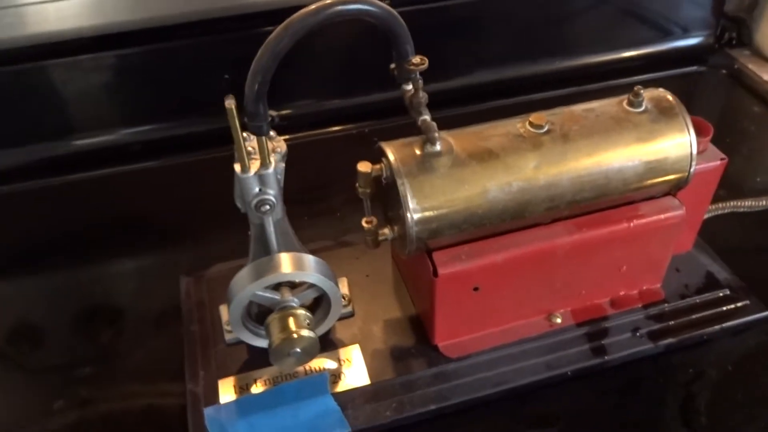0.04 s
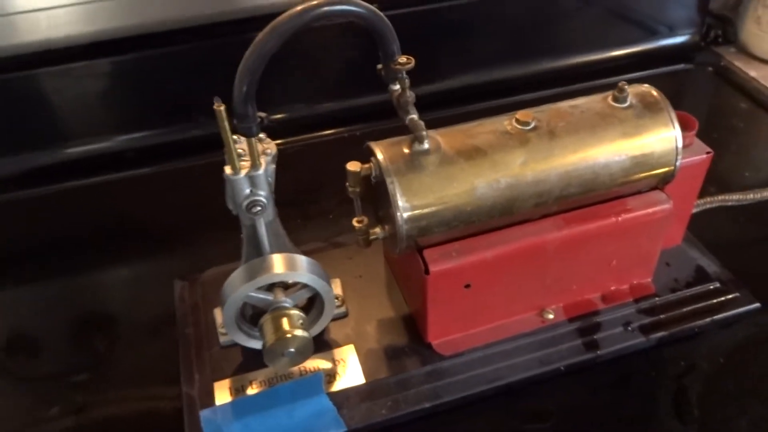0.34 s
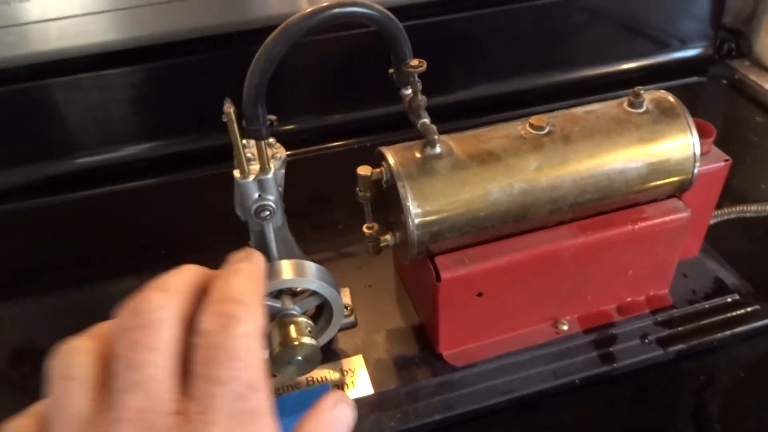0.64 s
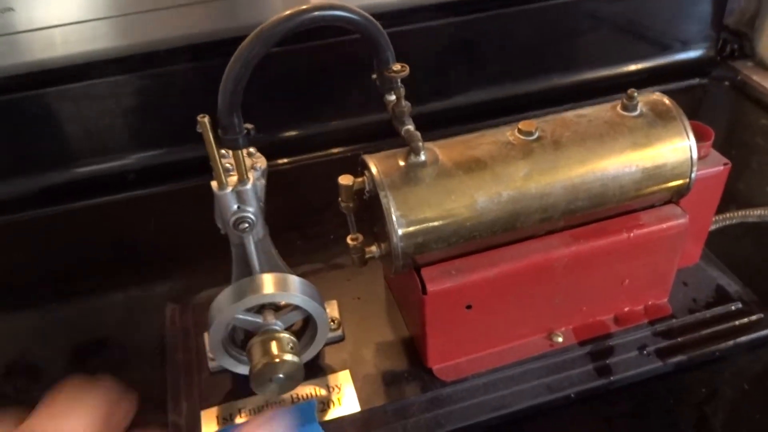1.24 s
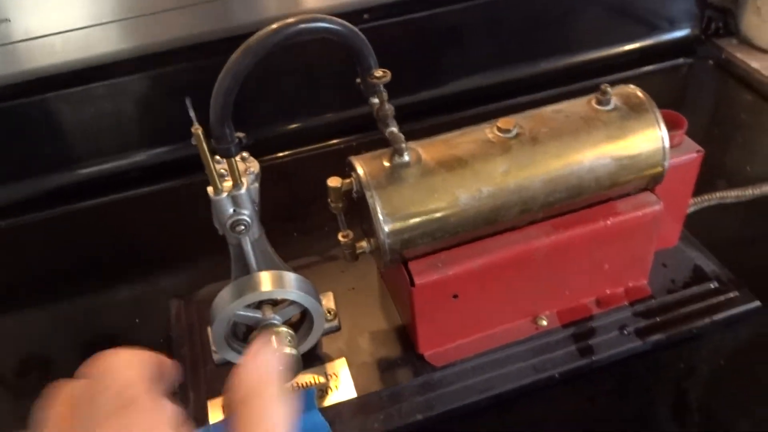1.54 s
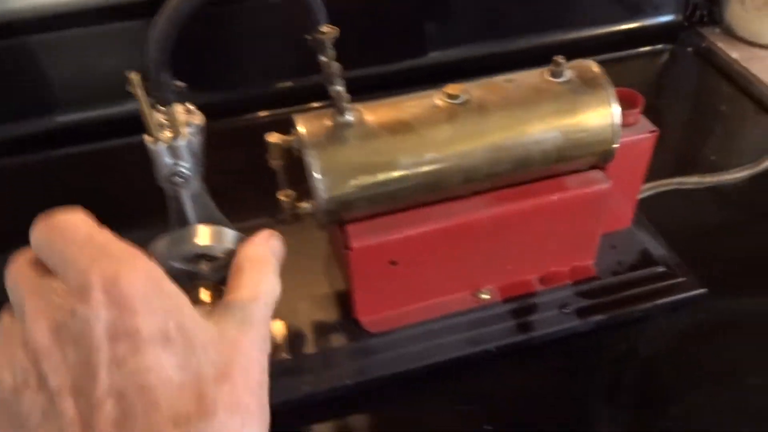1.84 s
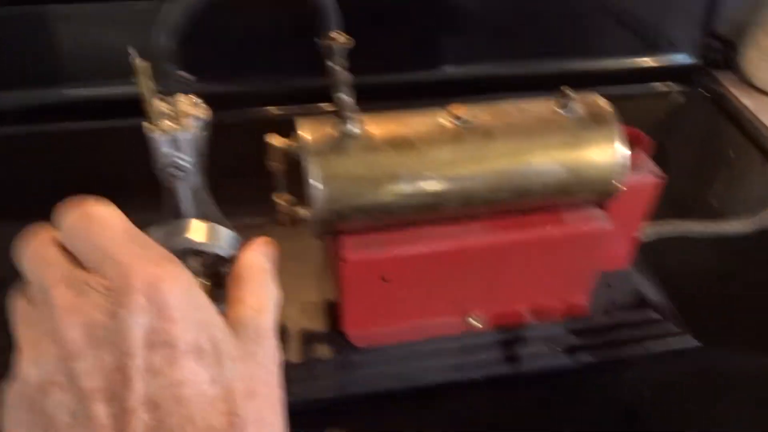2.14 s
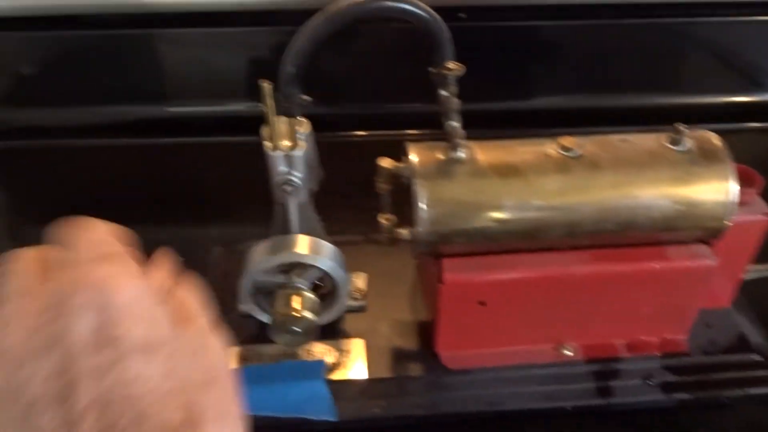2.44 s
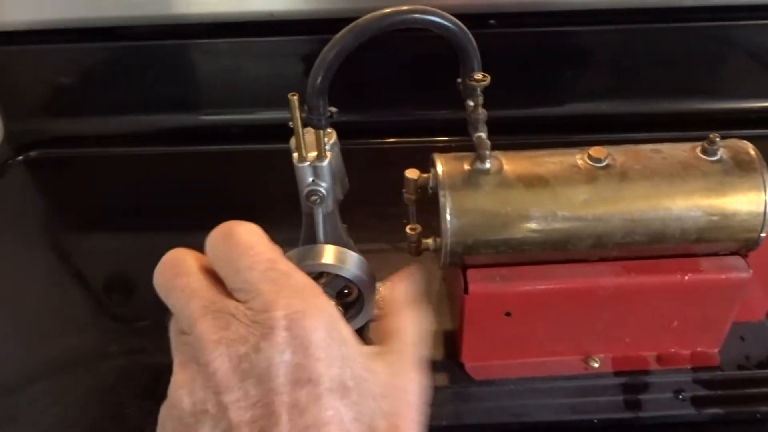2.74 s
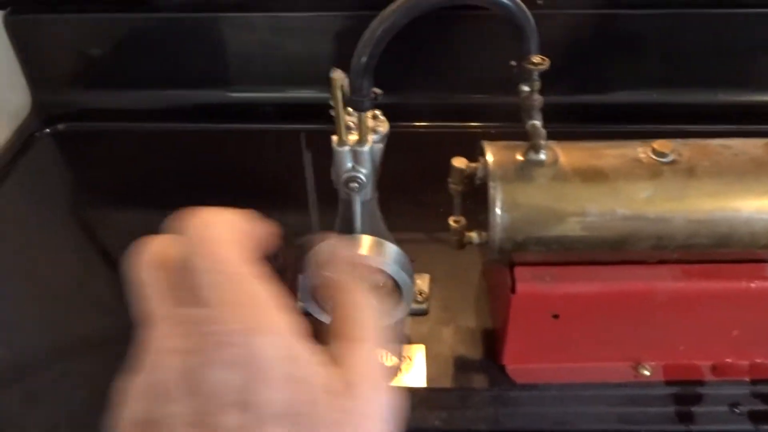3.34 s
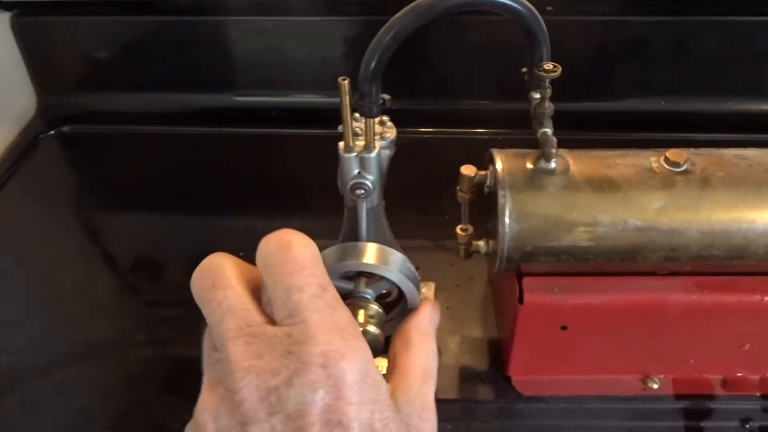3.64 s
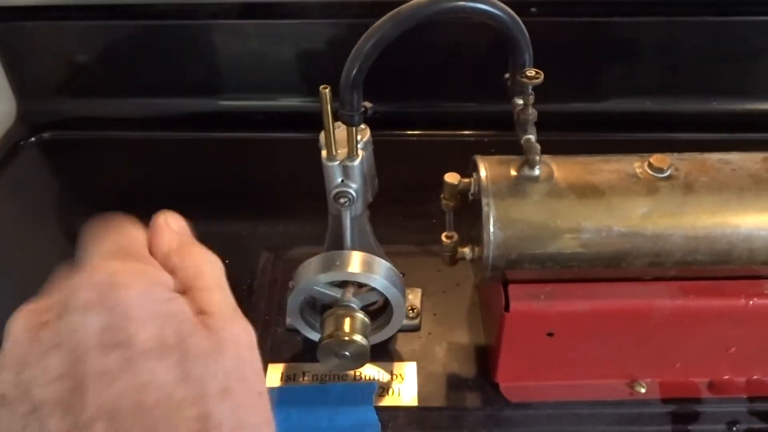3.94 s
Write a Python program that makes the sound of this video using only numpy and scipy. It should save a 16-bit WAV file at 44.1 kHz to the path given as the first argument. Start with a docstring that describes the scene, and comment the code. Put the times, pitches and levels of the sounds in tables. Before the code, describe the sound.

A small steam engine in a metal tray leaks a bright, wavering hiss. The exhaust puffs once, then the hiss grows louder while the linkage clacks and a hand bumps the base. The boiler simmers faintly underneath.

```python
"""A model steam engine stands under pressure in a metal tray while a hand tries to turn its flywheel.
First wet steam hisses past the piston, singing softly as it surges, and the hand thumps the base.
Near 2 s the exhaust puffs; the linkage clacks, and the leak shifts to the valve and back to the piston.
Last the crank comes round, the flywheel clinks and the exhaust opens again, quietly.
Throughout, the boiler simmers over a faint hum."""
import sys
import numpy as np
from scipy import signal
from scipy.fft import rfft, irfft
from scipy.io import wavfile

SR = 44100
rng = np.random.default_rng(int(sys.argv[2]) if len(sys.argv) > 2 else 0)


def unload_wav(signal):
    """Save mono or channel-first audio to the path in sys.argv[1] as 16-bit WAV at rate SR, clipped to [-1, 1]."""
    wavfile.write(
        sys.argv[1],
        SR,
        np.round(np.clip(np.atleast_2d(signal).T, -1, 1) * 32767).astype(np.int16),
    )


N = 176400


def cylinder_leak():
    """Turbulent jet noise: steam forced past the piston makes the main bright hiss."""
    # One list per spell of leaking. Each row: time in seconds, relative level in dB.
    spells = [
        [(0.0, -23), (0.014, -31.5), (0.024, -33.5), (0.076, -30), (0.164, -31), (0.176, -24), (0.208, -29.5),
         (0.308, -26.5), (0.332, -31), (0.596, -32), (0.614, -25), (0.778, -33), (0.806, -27), (0.9, -31)],
        [(0.9, -38), (0.928, -25.5), (0.948, -27.5), (0.972, -25), (1.062, -26.5), (1.232, -22.5),
         (1.27, -28.5), (1.278, -26.5), (1.412, -28), (1.426, -22.5), (1.476, -28.5), (1.824, -27.5),
         (1.834, -36), (1.84, -28)],
        [(2.07, -37), (2.088, -29.5), (2.216, -29), (2.256, -31), (2.33, -24), (2.346, -19.5), (2.356, -33),
         (2.372, -21), (2.384, -27), (2.398, -19), (2.404, -46), (2.41, -25)],
        [(3.03, -41), (3.052, -20), (3.234, -21), (3.412, -20), (3.468, -20), (3.682, -20.5), (3.706, -28.5),
         (3.756, -22), (3.77, -20), (3.808, -30.5), (3.83, -26), (3.84, -39)],
    ]
    # Spectrum of the jet. Each row: frequency in Hz, relative density in dB.
    colour = [(100, -28), (300, -24), (500, -21), (1500, -12.5), (2800, -11), (4300, -12), (7000, -4),
              (9500, -5.5), (11400, -10.6), (13500, 2), (15600, -3)]
    # Resonances of the steam path. Each row: centre in Hz, width in Hz, lift in dB.
    peaks = [(1368, 80, 7), (2805, 64, 5.5), (3630, 110, 3.8), (4155, 360, 6.5), (4730, 253, 10),
             (5080, 175, 5), (6326, 260, 7.0), (6700, 53, 4.5), (7770, 300, 4), (9200, 110, 5.5),
             (10060, 79, 11), (10500, 90, 10.5), (11140, 113, 13), (11920, 330, 8.5), (12700, 130, -13),
             (12870, 140, 9.5)]
    # Shelf on the lower part of the hiss. Each row: time in seconds, lift in dB.
    low_shelf = [(0, -2), (.15, -1), (.26, 6.5), (.4, 2.5), (.58, 3.5), (.64, 7), (.76, 2), (.9, 6),
                 (1.05, 6.5), (1.18, 4.5), (1.4, 1.5), (1.8, 0), (2.3, 3.5), (3.1, -6), (3.45, -2.5),
                 (3.7, 0.5)]
    hiss = jet(colour, peaks, flutter_db=0.85, flutter_rate=61)
    hiss = shelve_lows(hiss, envelope(low_shelf), edge_hz=2430)
    return from_db(2.5) * hiss * sum(flow(spell) for spell in spells)


def valve_leak():
    """Jet noise through the resonant valve opening whistles; its lower part grows faster with flow."""
    # Steam escaping at the valve. Each row: time in seconds, relative level in dB.
    spell = [(2.408, -27), (2.43, -20), (2.475, -26), (2.505, -22), (2.522, -25), (2.538, -20.5),
             (2.562, -24), (2.59, -20.5), (2.64, -24.5), (2.7, -20.5), (2.79, -20.5), (2.86, -21.5),
             (2.89, -18.5), (2.94, -17), (2.962, -19.5), (2.98, -22.5), (3.02, -24.5), (3.035, -17.5),
             (3.05, -20)]
    # Spectrum of the jet. Each row: frequency in Hz, relative density in dB.
    colour = [(100, -34), (300, -22), (500, -21.5), (1500, -10.5), (2800, -13), (4300, -6.5), (7000, -6),
              (9500, -8), (11400, -15.5), (13500, -7), (15600, -9)]
    # Resonances of the opening. Each row: centre in Hz, width in Hz, lift in dB.
    peaks = [(3960, 160, 10), (4750, 150, 7), (5930, 800, 6.5), (7550, 300, 8), (8540, 400, 11),
             (9420, 360, 8.5), (10120, 490, 11.5), (11050, 520, 10.7), (12000, 580, 5.8), (12545, 320, 8),
             (14200, 600, 7.5), (15200, 600, 10.7)]
    hiss = jet(colour, peaks, flutter_db=.5, flutter_rate=50)
    gain, middle_flow = flow(spell), from_db(-20.5)
    swell = (gain / middle_flow + 1e-9) ** 0.6
    return from_db(-1) * gain * shelve_lows(hiss, swell, edge_hz=12000)


def exhaust():
    """Pressure release: the cylinder empties in a puff that holds, then drops; steam trickles on."""
    # Openings of the port. Each row: start and end in seconds, relative puff level in dB,
    # seconds for the puff to fall 20 dB, relative trickle level in dB.
    openings = [(1.845, 2.085, -14.5, 0.098, -29.5), (3.827, 4.1, -38, .05, -31.5)]
    # Spectrum of the jet. Each row: frequency in Hz, relative density in dB.
    colour = [(100, -20), (300, -15), (500, -20.5), (1500, -14.5), (2800, -10.5), (4300, -9.5), (7000, -5),
              (9500, -14), (11400, -8.5), (13500, -4), (15600, -11.5)]
    # Resonances of the exhaust. Each row: centre in Hz, width in Hz, lift in dB.
    peaks = [(840, 630, 14.4), (1320, 300, 4.6), (3770, 220, 7), (4600, 400, 3.9), (5880, 300, 5.1),
             (6400, 220, 3.5), (7570, 260, 3.7), (8470, 800, 11.7), (9300, 310, 14.3), (10070, 400, 12),
             (14700, 320, 4)]
    gain = 0
    for start, end, puff_db, fall_s, trickle_db in openings:
        age = seconds() - start
        attack = np.clip(age / 0.002, 0, 1)
        puff = from_db(puff_db - 20 * np.clip(age / fall_s, 0, 2) ** 3.3)
        gain = gain + attack * np.hypot(puff, from_db(trickle_db)) * opened(start, end)
    return from_db(-4) * gain * jet(colour, peaks, flutter_db=2.0, flutter_rate=82)


def singing():
    """Cavity resonance: turbulence draws airy tones from narrow spaces of the cylinder in the surge."""
    # Strength of the singing. Each row: time in seconds, relative level in dB.
    surge = [(.925, -35.5), (1.02, -33), (1.15, -39.5), (1.24, -48)]
    # Cavity modes. Each row: centre in Hz, bandwidth in Hz, relative level in dB.
    cavities = [(1480, 73, -4.5), (2160, 120, -10), (4540, 120, -2)]
    noise, tones = rng.standard_normal(N), 0
    for hz, width, db in cavities:
        t60 = np.log(1000) / (np.pi * width)
        tones = tones + from_db(db) * rms_one(ring(noise, hz, t60))
    return flow(surge) * tones


def linkage():
    """Impact noise: each clack is a short tick of contact and a knock in the modes of the frame."""
    # Each row: start in seconds, relative tick level in dB, tick centre in Hz,
    # relative knock level in dB, most strongly driven frequency of the knock in Hz.
    clacks = [(.0145, -9, 2440, -31, 1900), (.095, -27, 1700, -23, 970), (1.825, -35, 2500, -24, 940),
              (2.027, -30, 2500, -23, 820), (2.248, -33, 3000, -15.5, 1350),
              (2.3364, -10, 10000, -35, 1400), (2.3434, -22, 10000, -20, 1400),
              (2.3695, -16, 7000, -20, 900), (2.3754, -11, 6500, -12, 1250), (2.392, -8.5, 8000, -19, 2600),
              (2.3955, -13, 6200, -10, 2300), (2.5681, -13.5, 6040, -10.5, 2040),
              (2.9845, -10, 8000, -11, 1290), (2.988, -19, 2000, -14, 700), (3.028, -22, 6000, -13.5, 910),
              (3.688, -23, 5500, -14, 1400), (3.7815, -11, 6000, -14.5, 856), (3.7987, -12, 2600, -8, 1360),
              (3.8297, -8, 5200, -19, 1410), (3.845, -27, 5000, -10, 1900)]
    # Spectrum of a tick. Each row: frequency in Hz, relative density in dB.
    tick_colour = [(200, 13), (1500, 11.5), (3000, 3.5), (5500, 1.5), (11000, -5), (16000, -16)]
    # Each row: frequency in Hz, relative level in dB, 60 dB decay time in seconds.
    frame_modes = [(685, -6.5, 0.038), (864, -12.5, .025), (1010, -9.5, .025), (1275, -9.5, 0.035),
                   (1425, -10, .025), (1880, -16, 0.018), (2110, -17, 0.024), (2450, -15, .025),
                   (2990, -18, .014)]
    tick_half_octaves, knock_spread_octaves = 0.81, .85
    times, tick_db, tick_hz, knock_db, strongest_hz = np.transpose(clacks)
    noise = coloured(rng.standard_normal(N), tick_colour)
    fade = decay(np.arange(SR // 10) / SR, t60=0.014)
    ticks, knocks = np.zeros((2, N)), 0
    for start, db, hz in zip((times * SR).astype(int), tick_db, tick_hz):
        span = slice(start, start + len(fade))
        edges = np.minimum(hz * 2 ** (tick_half_octaves * np.array([-1, 1])), SR / 2 - 1000)
        ticks[:, span] += signal.sosfilt(butter(2, edges, "band"), from_db(db) * fade * noise[:, span])
    for k, (hz, db, t60) in enumerate(frame_modes):
        share = resonance(np.log2(hz / strongest_hz), knock_spread_octaves) ** 2
        gains = share * from_db(knock_db + db + rng.standard_normal(len(times)))
        knocks = knocks + (-1) ** k * ring(strikes(times, gains), hz, t60)
    return ticks + knocks


def base():
    """Soft contact limits bandwidth: bumps of the hand set the low modes of the base booming."""
    # Each row: start in seconds, relative level in dB, most strongly driven frequency in Hz.
    thumps = [(1.217, -19, 120), (1.248, -10, 133), (2.285, -30, 210), (2.34, -22.5, 192),
              (2.356, -25.5, 182), (2.376, -30, 180), (2.985, -20, 190), (2.994, -20.5, 190),
              (3.027, -20.5, 180), (3.052, -18.5, 225), (3.769, -21, 149), (3.78, -11.5, 167),
              (3.817, -19.5, 162)]
    # Each row: frequency in Hz, relative level in dB, 60 dB decay time in seconds.
    base_modes = [(65.6, -13, 0.76), (117, -4.5, 0.058), (149.8, 4.5, 0.065), (205, 1.5, 0.063),
                  (274, 3.5, 0.024)]
    contact_s, spread_octaves = 0.0028, 0.57
    times, thump_db, strongest_hz = np.transpose(thumps)
    boom = 0
    for k, (hz, db, t60) in enumerate(base_modes):
        share = resonance(np.log2(hz / strongest_hz), spread_octaves)
        boom = boom + (-1) ** k * ring(strikes(times, share * from_db(thump_db + db)), hz, t60)
    boom = signal.sosfilt(butter(2, 78, "high"), boom)
    softness = np.exp(-1 / (contact_s * SR))
    return from_db(7.5) * signal.lfilter([1 - softness], [1, -softness], boom)


def flywheel():
    """Modal ringing: the wheel clinks as the crank comes round, then chatters briefly on its shaft."""
    # Each row: frequency in Hz, relative level in dB, 60 dB decay time in seconds.
    wheel_modes = [(3780, -6, .03), (4095, -1, 0.025), (4240, 1.5, 0.032), (4500, 2, 0.027),
                   (4660, 2, 0.024), (5070, -3, 0.025)]
    strike_s = 3.829
    age = seconds() - strike_s
    chatter = grains(per_s=1800, spread_db=1.5) * (age > 0) * decay(np.abs(age), t60=0.13)
    blows = from_db(-25.5) * (strikes([strike_s], 1) + from_db(-5) * chatter)
    return sum((-1) ** k * ring(blows * from_db(db), hz, t60)
               for k, (hz, db, t60) in enumerate(wheel_modes))


def simmer():
    """Bubble resonance: small bubbles collapse in the boiler, each a brief damped tone."""
    # Liveliness of the boiler. Each row: time in seconds, relative level in dB.
    liveliness = [(0, 4.5), (.8, 0), (1.05, 4), (1.6, 3), (1.9, -4.5), (2.25, 7.5), (2.7, 0), (3.05, 7),
                  (3.3, -3), (3.7, 5), (4, 1)]
    bubbles_per_s, ring_cycles = 420, 11.7
    pitches = np.geomspace(680, 1600, 18)
    pan = from_db([[4.5], [-4.5]])
    pops = 0
    for k, hz in enumerate(pitches):
        collapses = grains(bubbles_per_s / len(pitches), spread_db=2.0)
        pops = pops + ring(collapses, hz, ring_cycles / hz) * pan ** (-1) ** k  # alternate sides
    return from_db(-48) * envelope(liveliness) * rms_one(pops)


def background():
    """Tones over a noise floor: two phase-modulated hum lines waver in the boiler and room rumble."""
    # Each row: frequency in Hz, rms level in dB.
    hum_lines = [(177.6, -54.5), (387.6, -56)]
    # Low spectrum of the rumble. Each row: frequency in Hz, relative density in dB.
    rumble_colour = [(15, -52), (25, -31), (86, -11), (119, -10), (145, -6), (174, -1.5), (264, -10.5),
                     (390, -10), (412, -23.5), (700, -10.5), (910, -27), (1540, -120)]
    hum = sum(from_db(db) * np.sqrt(2) * np.sin(2 * np.pi * hz * seconds() + .5 * drift(2.6))
              for hz, db in hum_lines)
    rumble = coloured(rng.standard_normal(N), rumble_colour + [(1500, -16), (6000, -48)])
    return hum + from_db(-46.5) * rumble


def tray(x, echo_db):
    """Reverberation: the tray adds short dense reflections, much alike at both ears."""
    t, likeness = np.arange(SR // 2) / SR, .8
    mid, side = rng.standard_normal((2, len(t))) * decay(t, t60=0.21) * (t > .002)
    side = signal.sosfilt(butter(1, 2500), side) * np.sqrt(1 - likeness)
    tail = np.array([mid + side, mid - side]) / np.sqrt(np.sum(mid ** 2 + side ** 2))
    return x + from_db(echo_db) * signal.fftconvolve(x, tail, axes=1)[:, :N]


def jet(colour, peaks, flutter_db, flutter_rate):
    """Source and filter: fluttering turbulence and spitting droplets excite a steam path."""
    turbulence = rng.standard_normal(N)
    droplets = from_db(-10.5) * rms_one(grains(per_s=500, spread_db=2))
    flutter = from_db(flutter_db * drift(flutter_rate))
    return coloured((turbulence + droplets) * flutter, colour, peaks)


def coloured(source, colour, peaks=()):
    """Spectral shaping: a white source takes on a colour and resonances, in stereo at unit rms."""
    # Likeness of left and right. Each row: frequency in Hz, correlation from 0 to 1.
    likeness = [(100, 1), (350, 0.86), (1000, 0.54), (2200, 0.9), (5000, 1), (9000, 0.93), (14000, 0.99)]
    hz, db = np.arange(N // 2 + 1) * SR / N, at_hz(colour)
    for centre, width, lift in peaks:
        db = db + lift * resonance(hz - centre, width / 2)
    alike = at_hz(likeness)
    mid = rfft(rms_one(source)) * np.sqrt(1 + alike)
    side = rfft(rng.standard_normal(N)) * np.sqrt(1 - alike)
    return rms_one(irfft(np.array([mid + side, mid - side]) * from_db(db), N))


def flow(spell):
    """Amplitude envelope of one spell of steam, silent while its path is shut."""
    return envelope(spell) * opened(spell[0][0], spell[-1][0])


def opened(start, end):
    """Gating: a steam path is open between two times and shuts quickly outside them."""
    t, closing_s = seconds(), 0.0063
    return np.clip(1 + np.minimum(t - start, end - t) / closing_s, 0, 1)


def shelve_lows(x, gain, edge_hz):
    """Zero-phase shelving: the gain acts on the band below the edge."""
    return x + signal.sosfiltfilt(butter(2, edge_hz), x) * (gain - 1)


def ring(clicks, hz, t60):
    """Damped oscillator: a unit click starts a decaying sine of height 1."""
    r, w = decay(1 / SR, t60), 2 * np.pi * hz / SR
    return signal.lfilter([0, np.sin(w)], [1, -2 * r * np.cos(w), r * r], clicks + 1e-18)


def strikes(times, gains):
    """Impulses at the given times."""
    clicks = np.zeros(N)
    clicks[(np.asarray(times) * SR).astype(int)] = gains
    return clicks


def grains(per_s, spread_db):
    """Shot noise: random clicks, mostly small, a few large."""
    sizes = from_db(spread_db * np.minimum(rng.exponential(1, N), 5)) * rng.choice([-1, 1], N)
    return sizes * (rng.random(N) < per_s / SR)


def drift(rate):
    """Low-pass noise: a wander of unit rms, mostly slower than the rate in Hz."""
    step, settle = 40, 2000
    r = np.exp(-2 * np.pi * step * rate / SR)
    slow = signal.lfilter([1], [1, -2 * r, r * r], rng.standard_normal(N // step + settle + 2))[settle:]
    return np.interp(np.arange(N) / step, np.arange(len(slow)), rms_one(slow))


def resonance(offset, half_width):
    """Resonance curve: 1 at the centre, one half at the half width."""
    return 1 / (1 + (offset / half_width) ** 2)


def decay(t, t60):
    """Exponential damping: 60 dB down after t60 seconds."""
    return np.exp(-np.log(1000) * t / t60)


def envelope(points):
    """Gain at every sample, interpolated in decibels."""
    return from_db(np.interp(seconds(), *np.transpose(points)))


def at_hz(points):
    """A spectrum interpolated over log frequency at every FFT bin."""
    hz, value = np.transpose(points)
    return np.interp(np.log(np.arange(N // 2 + 1) * SR / N + 1), np.log(hz), value)


def butter(order, hz, kind="low"):
    """Sections of a maximally flat filter."""
    return signal.butter(order, hz, kind, fs=SR, output="sos")


def from_db(db):
    """Decibels to gain."""
    return 10 ** (np.asarray(db) / 20)


def rms_one(x):
    """Normalisation to unit rms."""
    return x / np.sqrt(np.mean(x ** 2) + 1e-20)


def seconds():
    """Time of each sample."""
    return np.arange(N) / SR


def scene():
    """Superposition: steam, handling and boiler add with their reflections and the background."""
    steam = tray(cylinder_leak() + singing() + valve_leak() + exhaust(), echo_db=-9)
    engine = tray(linkage() + flywheel() + simmer(), echo_db=-6)
    return steam + engine + base() + background()


def record(dry):
    """Band limiting: a steep low-pass cuts the highest treble."""
    return signal.sosfilt(signal.ellip(12, .1, 85, 15900, fs=SR, output="sos"), dry)


dry = scene()
out = record(dry)
unload_wav(out)
```